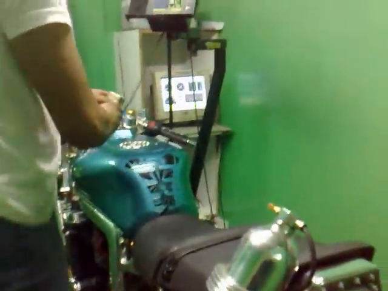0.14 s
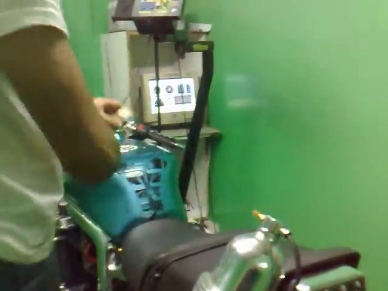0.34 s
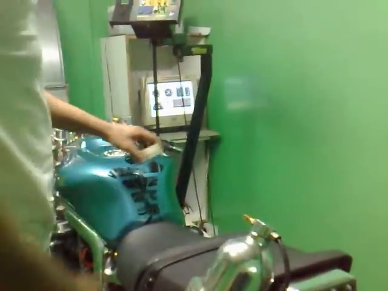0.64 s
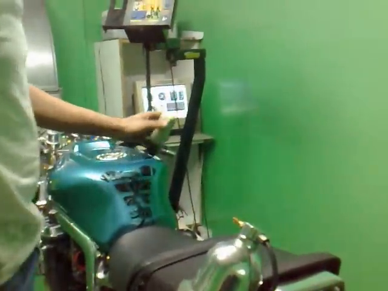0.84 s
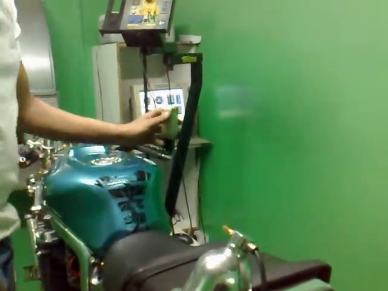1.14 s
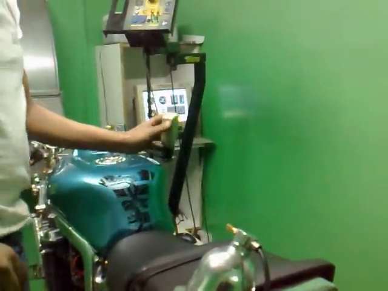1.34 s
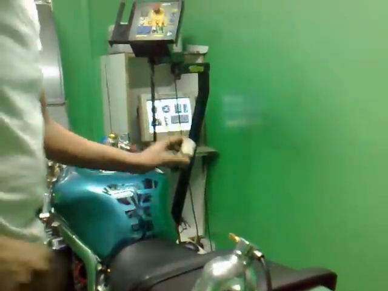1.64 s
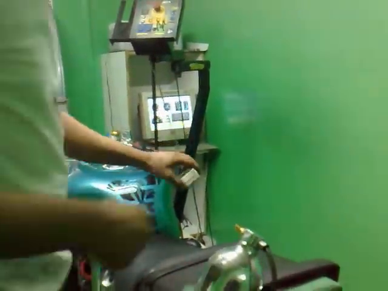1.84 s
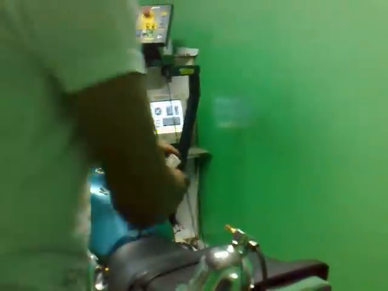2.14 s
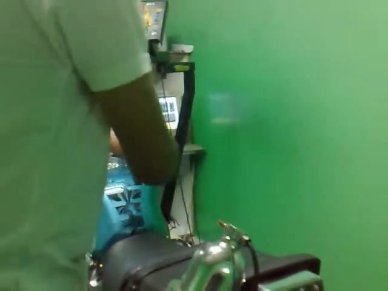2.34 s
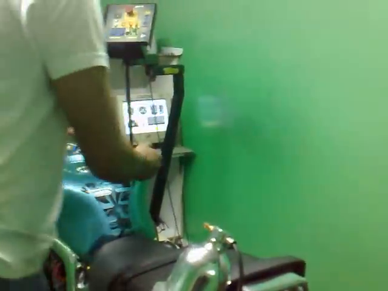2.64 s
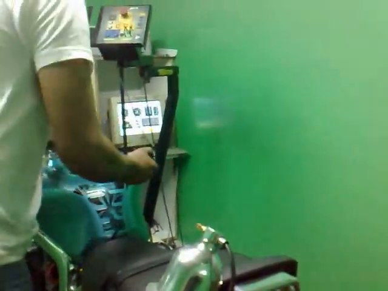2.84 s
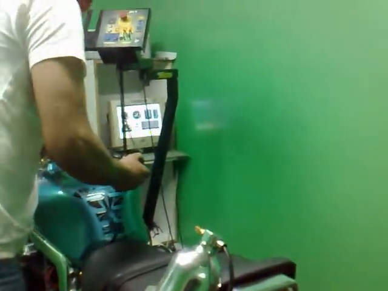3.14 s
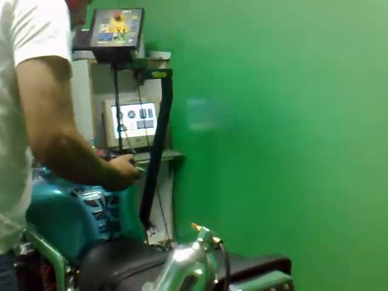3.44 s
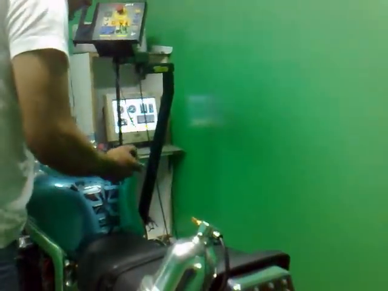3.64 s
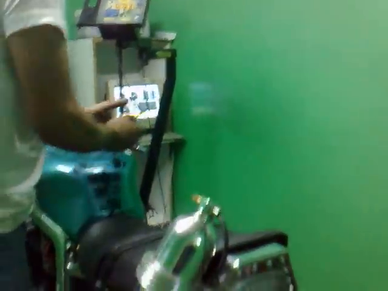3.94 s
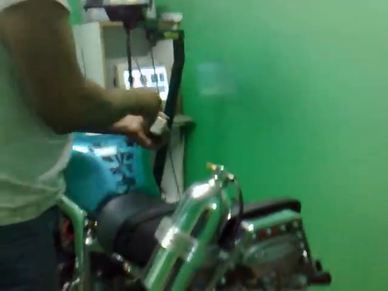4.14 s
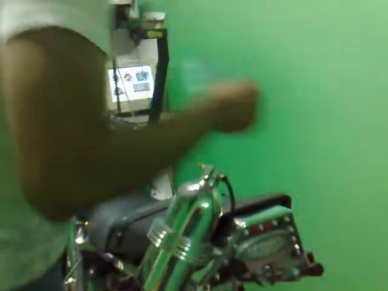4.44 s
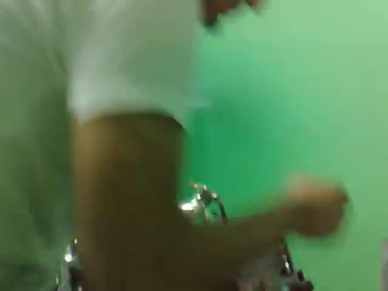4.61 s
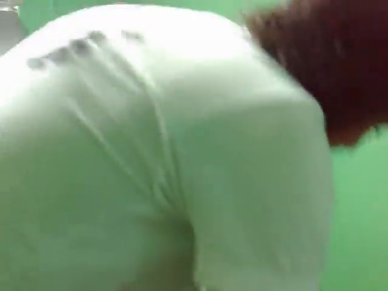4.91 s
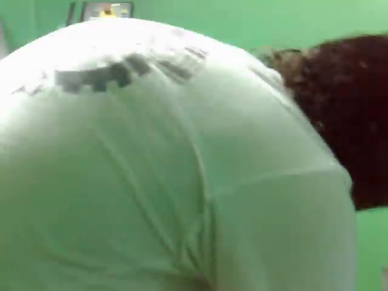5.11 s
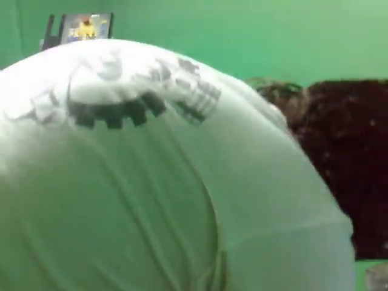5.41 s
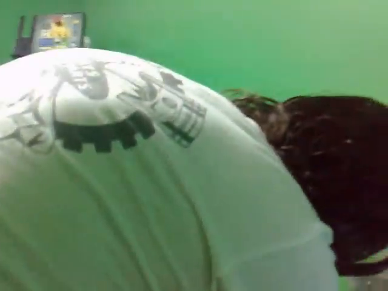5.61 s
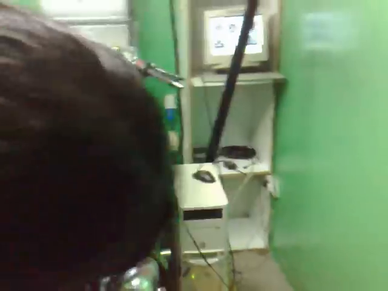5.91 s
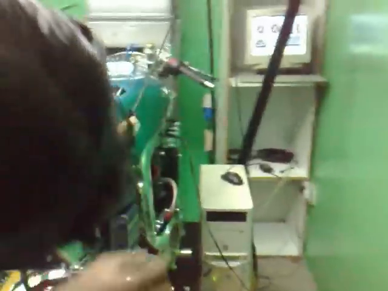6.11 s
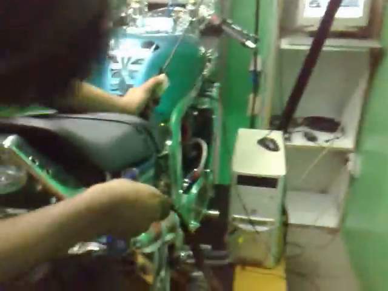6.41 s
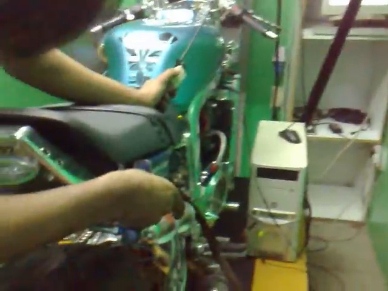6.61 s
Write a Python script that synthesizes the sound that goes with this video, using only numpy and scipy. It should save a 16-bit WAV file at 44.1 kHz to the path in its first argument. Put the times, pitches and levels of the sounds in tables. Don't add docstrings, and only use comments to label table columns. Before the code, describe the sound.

A motorcycle engine idles with uneven exhaust booms and metallic clatter, shuts off, and a blower's steady rush and thin whine remain, with one brief dropout.

```python
import sys
import numpy as np
from scipy import signal
from scipy.fft import rfft, irfft
from scipy.io import wavfile
from scipy.ndimage import uniform_filter1d

SR = 44100
rng = np.random.default_rng(int(sys.argv[2]) if len(sys.argv) > 2 else 0)


def rack_gain(trim_db):
    fader = np.asarray(trim_db, float)
    return 10 ** (fader / 20)


def unload_audio(sound):
    columns = np.transpose(np.atleast_2d(sound))
    steps = np.round(np.clip(columns, -1, 1) * 32767)
    wavfile.write(sys.argv[1], SR, steps.astype(np.int16))


N = 298116
T = np.arange(N) / SR

# f/Hz, level/dB per Hz
RUMBLE = [(15, -51.5), (25, -26), (64, 1), (81, -3), (101, 2.5), (124, -14), (150, -2), (179, -14),
          (200, -6), (260, -45), (440, -120)]
DUCT_BODY = [(110, -30), (180, -5.5), (216, -2.5), (248, -1.5), (333, -3.5), (480, -9.5), (620, -28),
             (1060, -120)]
RUSH = [(260, -36.5), (450, -15.5), (530, -6), (694, -9.5), (842, -9), (1010, -13), (1870, -12),
        (2750, -20), (4500, -31.5), (5850, -56), (9900, -120)]
HISS = [(1760, -36), (3000, -1), (4880, -4.5), (6360, -10), (7500, -20.5), (9750, -43), (16500, -120)]
FIZZ = [(4120, -29.5), (7000, -6.5), (8020, -4), (10100, -3.5), (12100, -8), (13600, -8.5), (15800, -15)]
# level while ducked by the engine/dB, lift/dB, step once the microphone has moved/dB
AIR_LAYERS = [
    (-32.5, 8, -0.5),
    (-29, 6, 1),
    (-48.5, 8.5, 3.5),
    (-42, 9.5, 4.5),
]
# t/s, length/s, level/dB
GUSTS = [
    (4.42, 0.064, 2.5),
    (5.002, .15, -2.5),
    (5.602, .1, 0.5),
    (6.5, .06, 2.5),
    (6.622, .05, -5.5),
    (6.74, .05, 1),
]
# f/Hz, waver/Hz
BLADE_HZ = [
    (534, 1.2),
    (635, 1.8),
]
# level while ducked/dB, lift/dB
BLADE_DB = [
    (-39.5, 8),
    (-43, -2.5),
]
# t/s, length/s, level/dB
FIRST_FAN = [(0, 0.27, 4), (.9, .4, -1), (2.095, 0.52, -2), (3.05, 0.37, -8), (3.948, 0.074, 4),
             (4.4, .2, 3), (5.42, .08, -3.5), (5.847, 0.26, 3.5), (6.598, 0.14, -19.5)]
SECOND_FAN = [(0, 0.81, 5.5), (1.2, 0.33, 3.5), (2.4, 0.38, 3.5), (3.1, 0.26, 0), (4.1, .25, -4),
              (4.52, 0.1, 10), (5.046, 0.09, 10), (5.33, 0.12, 16.5), (6.444, 0.12, 16.5), (6.76, .1, 11)]
# f/Hz, width/Hz, level/dB
HUMS = [(215.4, 11, -34.5), (285.2, 5.3, -37.5), (390, 8.5, -45), (428.5, 1.9, -40), (583.5, 13, -41),
        (877, 8.9, -50)]

# t/s, f/Hz, width/Hz, level/dB
METAL_RINGS = [(3.6, 1000, 45, -35), (3.905, 960, 40, -30), (4.4, 1000, 50, -34), (2.5, 2200, 40, -36.5)]
# f/Hz, width/Hz, level/dB
TAPPET_RINGS = [(1720, 130, 0), (1930, 130, 1), (3440, 110, -2), (4170, 120, -4), (8500, 110, -12),
                (12200, 260, -13)]
# f/Hz, level/dB per Hz
CASING = [(180, -12.5), (300, -5.5), (466, -16), (638, -14.5), (885, -15), (1830, -12), (2650, -15.5),
          (3470, -16.5), (7170, -25), (9000, -29), (11700, -60), (19800, -120)]
COVERS = [(5000, -37.5), (7200, -4), (10000, 4.5), (13500, 3.5), (15000, 2), (15800, -4.5)]
# f/Hz, width/Hz, level/dB
CASING_RINGS = [(1890, 200, 2.5), (3320, 60, 8), (4310, 99, 3.5), (5110, 560, 3)]
COVER_RINGS = [(8500, 110, 15), (12200, 520, 10), (14550, 300, 3)]
# t/s, length/s, casing level/dB, cover level/dB
RATTLES = [(0.075, 0.074, 3, 2.5), (0.723, 0.056, 2, 2), (1.03, 0.077, 1, 2), (1.26, 0.027, 1, 1.5),
           (1.617, 0.12, 1.5, 3), (1.9, 0.023, 1, 3.5), (2.0, 0.082, 1.5, 1.5), (2.2, .1, -1, 0),
           (2.48, 0.05, 0, 3), (2.644, 0.017, 1, 4), (2.72, 0.055, -1.5, -2), (3.1, 0.22, 0.95, 1.2),
           (3.547, 0.018, -2.5, -3.5), (3.65, .08, 0, 0.5), (3.865, 0.02, -3.5, -6), (3.907, .013, 8.5, 9),
           (3.94, .012, 1.5, 5)]

# t/s, turns per second
CRANK = [
    (0, 24.3),
    (2.1, 24.3),
    (2.4, 23.4),
    (2.7, 24.2),
    (3.55, 24.3),
    (3.7, 19),
    (3.85, 12),
]
CYLINDERS = [0, -10, -1.5, -8]
# f/Hz, width/Hz, level/dB
THUMP = [(54, 6, -6), (63, 4, 0), (79, 5, -2.5), (100, 12, -11)]
LOWER_PIPE = [(124, 10, -12), (146, 4, 0)]
UPPER_PIPE = [(179, 10, -5), (202, 6, 0), (213, 5, -3.5)]
BARK = [(250, 12, -8), (277, 4, 0), (298, 7, -10), (338, 10, -10), (378, 5, -9), (425, 12, -16)]
# idle level/dB, drift/dB per s, dying from t/s, dying/dB per s
EXHAUST_PARTS = [
    (-23, 0.85, 3.815, -420),
    (-17, 0, 3.69, -125),
    (-15.5, 0, 3.6, -105),
    (-22.5, -0.35, 3.68, -160),
]
# t/s, upper pipe/dB, lower pipe/dB, bark/dB
SURGES = [(0, -1.5, 1.5, 2), (.14, 3.5, 3, -1), (.28, 6, -4, -7.5), (.56, -1.5, -3, 2),
          (.7, 0.5, 4.5, -1.5), (.84, 0.5, -0.5, -2.5), (.98, -2.5, 1, -0.5), (1.12, 5.5, 2.5, 2),
          (1.4, 3.5, 0, 0), (1.54, -2, -1, 2), (1.68, 1, 3.5, -1), (1.96, 0, 5.5, -3), (2.1, 7, -6.5, -1.5),
          (2.24, -.5, -1.5, 0.5), (2.52, 2, 3, 1), (2.66, 2, -2.5, -1.5), (2.94, 2, 2, -1), (3.22, 3, 2, 1),
          (3.36, 5.5, 1.5, 0), (3.5, -1.5, -2.5, 1), (3.58, 2.5, -1.5, -1)]

# from t/s, to t/s
DROPOUT = (6.079, 6.2605)


def evened(x, size=0):
    if size:
        power = uniform_filter1d(uniform_filter1d(x ** 2, size), size)
    else:
        power = np.mean(x ** 2)
    return x / np.sqrt(abs(power) + 1e-20)


def ramp(start_s, db_per_s):
    return db_per_s * np.maximum(T - start_s, 0)


def swells(s, length, db):
    coarse = T[::64]
    bumps = np.exp(-.5 * ((coarse[:, None] - s) / length) ** 2) @ np.asarray(db)
    return np.interp(T, coarse, bumps)


def wander(rate_hz):
    kept = rfft(rng.standard_normal(N)) / (1 + (np.fft.rfftfreq(N, 1 / SR) / rate_hz) ** 4)
    return evened(irfft(kept, N))


def resonate(x, hz, width):
    turn = np.exp(2j * np.pi * hz * np.arange(len(x)) / SR)
    r = np.exp(-np.pi * width / SR)
    return 2 * (turn * signal.lfilter([1 - r], [1, -r], x / turn)).real


def noise(spectrum, rings=(), patchy_db=1.5, size=1024):
    frames = 4 * N // size + 5
    hz = np.fft.rfftfreq(size, 1 / SR)
    a, b, patches = rng.standard_normal((frames, len(hz), 3)).T
    patches = uniform_filter1d(uniform_filter1d(patches, size=10, axis=0), size=10, axis=1)
    patches = evened(patches)
    f, db = np.transpose(spectrum)
    shape = rack_gain(np.interp(np.log(hz + 1), np.log(f + 1), db, -90, -90))
    shape = shape * (1 + sum((rack_gain(g) - 1) / (1 + (2 * (hz - c) / w) ** 2) for c, w, g in rings))
    z = (a + 1j * b) * shape[:, None] * rack_gain(patchy_db * patches)
    return evened(signal.istft(z, nperseg=size, noverlap=size * 3 // 4)[1][:N])


def blade_tones(creep):
    out = np.zeros(N)
    for (db, lift), shade, (hz, waver) in zip(BLADE_DB, (FIRST_FAN, SECOND_FAN), BLADE_HZ):
        level_db = db + lift * creep + swells(*np.transpose(shade)) + 1.1 * wander(11.5)
        phase = 2 * np.pi * np.cumsum(hz + waver * wander(5.8)) / SR
        out += rack_gain(level_db) * np.sqrt(2) * np.sin(phase)
    return out


def duct_hums(rush_db):
    out = np.zeros(N)
    for hz, width, db in HUMS:
        tone = resonate(resonate(rng.standard_normal(N), hz, width), hz, width)
        out += rack_gain(db + rush_db - rush_db.max() - 4.0) * evened(tone)
    return out


def panel_drone(peak_s=6.6, rise_s=0.113, fall_s=0.07, db=-21.5):
    tone = np.sqrt(2) * np.sin(2 * np.pi * np.cumsum(135 + 2.7 * wander(7.8)) / SR)
    swell = np.exp(-((T - peak_s) / np.where(T < peak_s, rise_s, fall_s)) ** 2)
    return tone * rack_gain(db) * swell


def blower():
    creep = np.sin(np.pi / 2 * np.clip((T - 3.8) / 1.41, 0, 1)) ** 2
    moved = T > DROPOUT[1]
    rumble_db, rush_db, hiss_db, body_db = (db + lift * creep + step * moved
                                            for db, lift, step in AIR_LAYERS)
    rumble_db = rumble_db + swells(*np.transpose(GUSTS))
    hiss_db = hiss_db + ramp(6.38, -5.5)
    body_db = body_db + 6 * np.clip((3.8 - T) / 0.48, 0, 1)
    fizz_db = hiss_db - 11.5 + 0.68 * (hiss_db - hiss_db.max())
    gusts = rack_gain(0.5 * wander(4.5))
    air = rack_gain(rumble_db) * evened(noise(RUMBLE, patchy_db=-1.0, size=4096), size=5000)
    air += gusts * rack_gain(rush_db - 3.5) * noise(RUSH, patchy_db=0.85, size=1024)
    air += gusts * rack_gain(hiss_db) * noise(HISS, patchy_db=0.9, size=512)
    air += rack_gain(body_db) * noise(DUCT_BODY, patchy_db=2.5, size=2048)
    air += gusts * rack_gain(fizz_db) * noise(FIZZ, patchy_db=1.8, size=512)
    return air + blade_tones(creep) + duct_hums(rush_db) + panel_drone()


def metal_rings():
    out = np.zeros(N)
    for s, hz, width, db in METAL_RINGS:
        u = np.pi * width * np.maximum(T - s, 0)
        out += rack_gain(db) * np.e * u * np.exp(-u) * np.sin(2 * np.pi * hz * T)
    return out


def tappets(puffs, lag_s=.011, spread_db=3.5):
    at = np.flatnonzero(puffs)
    chance = rng.standard_normal((400, len(TAPPET_RINGS), 2, 2))[:len(at)]
    out = 0
    for k, (hz, width, db) in enumerate(TAPPET_RINGS):
        ticks = np.zeros(N)
        when = at[:, None] + SR * (0.0043 + np.array([0, lag_s]) + .002 * chance[:, k, :, 0])
        ticks[np.abs(when).astype(int)] = rack_gain(spread_db * chance[:, k, :, 1])
        ring = resonate(resonate(ticks, hz, width), hz, 2 * width)
        out = out + rack_gain(db) * evened(ring)
    return evened(out)


def clatter(puffs, depth=0.38, fade_s=0.054):
    beat = signal.lfilter([1], [1, -np.exp(-1 / (fade_s * SR))], puffs)
    throb = (1 + depth * beat) * rack_gain(0.4 * wander(11))
    s, length, casing_flare, cover_flare = np.transpose(RATTLES)
    running_db = -0.84 * T + ramp(3.6, -14.5)
    rest_s = 3.83
    casing_db = -29 + running_db + ramp(rest_s, -60) + swells(s, length, casing_flare)
    cover_db = -34 + .5 * running_db + ramp(rest_s, -200) + swells(s, length, cover_flare)
    casing = evened(throb * noise(CASING, CASING_RINGS, patchy_db=1.0, size=512))
    covers = evened(throb * noise(COVERS, COVER_RINGS, patchy_db=1.6, size=1024))
    metal = rack_gain(casing_db + 4.0) * casing + rack_gain(cover_db) * covers
    metal += rack_gain(casing_db - 6) * tappets(puffs)
    return metal * np.clip((4.0 - T) / 0.032, 0, 1)


def firings(drift=.006, scatter_s=.002, uneven_db=2.2):
    s, turns_per_s = np.transpose(CRANK)
    speed = np.interp(T, s, turns_per_s)
    phase = np.cumsum(2 * speed * (1 + drift * wander(2.5))) / SR + .8
    at = np.flatnonzero(np.diff(np.floor(phase)))
    at = at[T[at] < CRANK[-1][0]]
    strength, late = rng.standard_normal((400, 2))[:len(at)].T
    puffs = np.zeros(N)
    when = abs(at + (SR * scatter_s * late).astype(int))
    puffs[when] = rack_gain(np.resize(CYLINDERS, len(at)) + uneven_db * strength)
    return puffs


def exhaust(puffs, turbulence=.25, lead=12705):
    drive = evened(puffs - puffs.mean()) + turbulence * rng.standard_normal(N)
    drive = np.concatenate([drive[:lead], drive])
    drive = signal.sosfilt(signal.butter(2, [45, 420], "bandpass", fs=SR, output="sos"), drive)
    s, *surges_db = np.transpose(SURGES)
    upper, lower, bark = (swells(s, 0.062, db) for db in surges_db)
    surges = (0, lower, upper, bark)
    out = 0
    for part, surge, modes in zip(EXHAUST_PARTS, surges, (THUMP, LOWER_PIPE, UPPER_PIPE, BARK)):
        idle_db, drift, dying_s, dying = part
        ring = 0
        for k, (hz, width, db) in enumerate(modes):
            ring = ring + (-1) ** k * rack_gain(db) * evened(resonate(drive, hz, width))
        level_db = idle_db + drift * T + surge + ramp(dying_s, dying)
        out = out + rack_gain(level_db) * evened(ring, size=4000)[lead:]
    return out


def scene():
    puffs = firings()
    return (blower() + metal_rings() + clatter(puffs) + exhaust(puffs))[None]


def band_limit(x):
    return signal.sosfilt(signal.butter(12, 16180, fs=SR, output="sos"), x)


def record(dry, ceiling=.76, knee=3.5, boost_db=.9):
    x = dry * rack_gain(boost_db)
    x = x / (1 + abs(x / ceiling) ** knee) ** (1 / knee)
    fade_out, fade_in = (DROPOUT[0] - T) / .017, (T - DROPOUT[1]) / .0015
    on = np.clip(np.maximum(fade_out, fade_in), 0, 1)
    return band_limit(x * np.sin(np.pi / 2 * on))


dry = scene()
out = record(dry)
unload_audio(out)
```